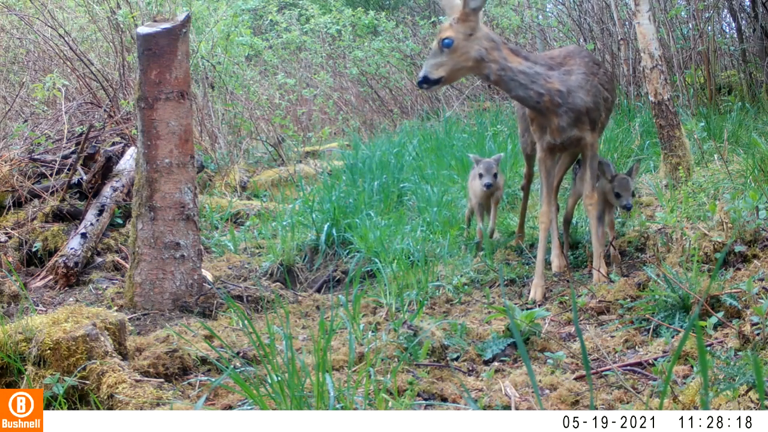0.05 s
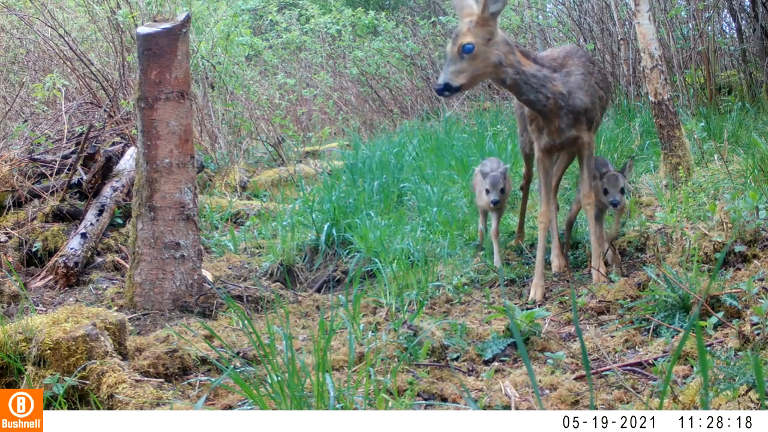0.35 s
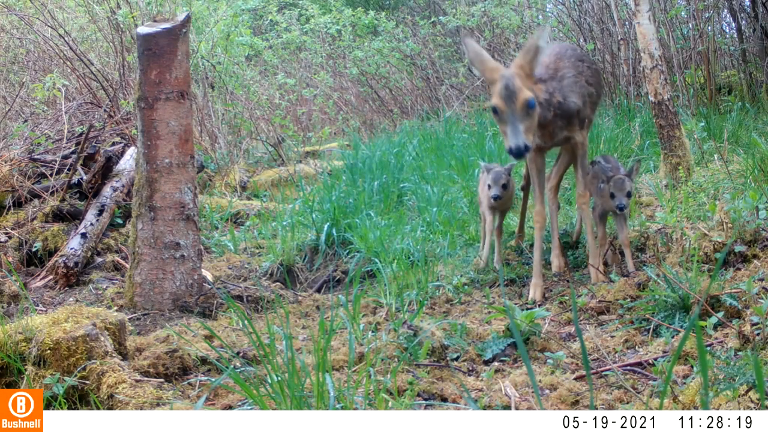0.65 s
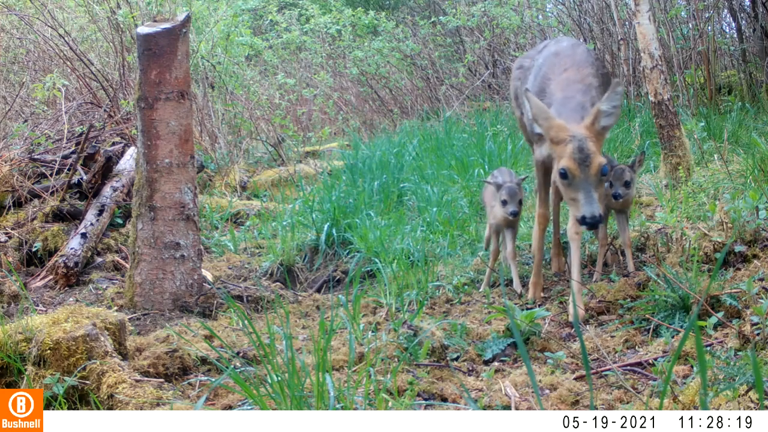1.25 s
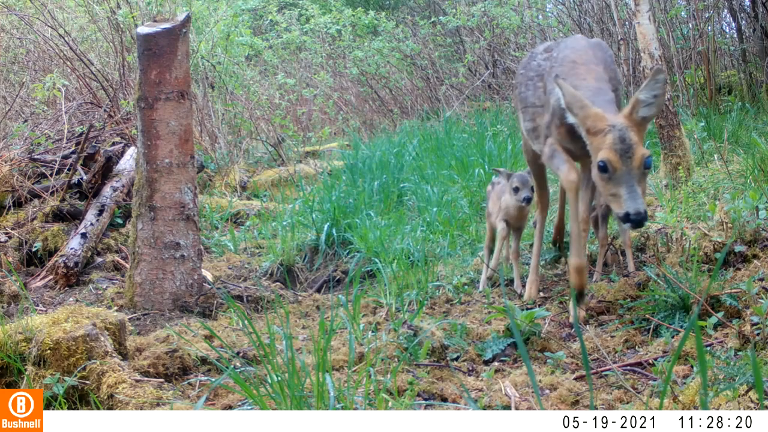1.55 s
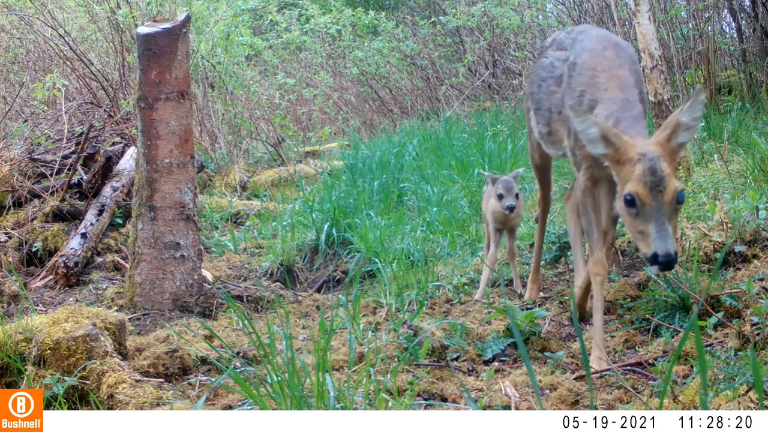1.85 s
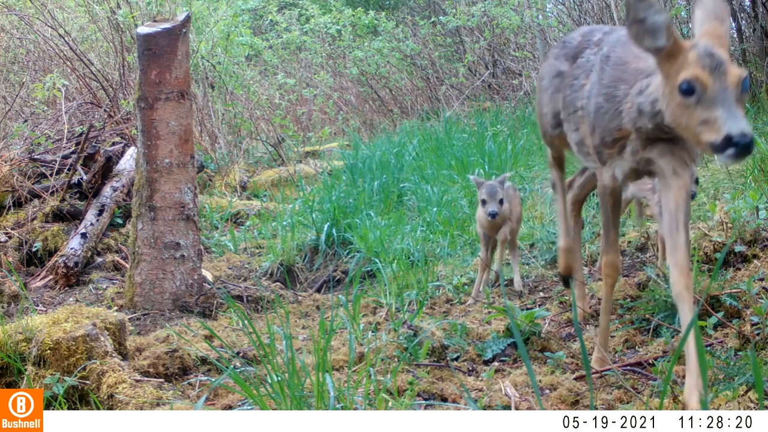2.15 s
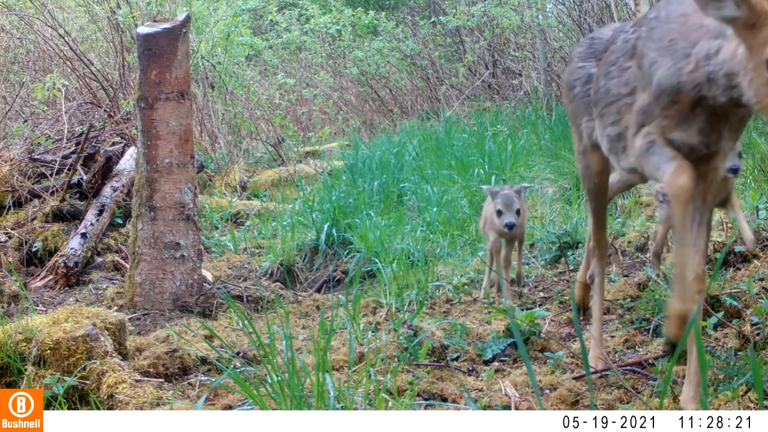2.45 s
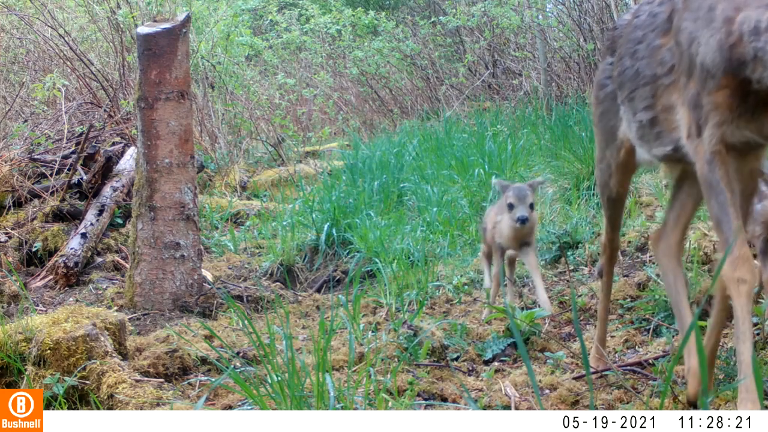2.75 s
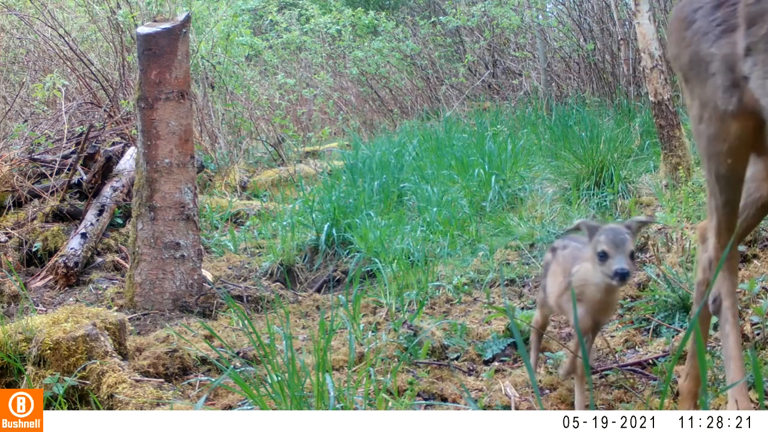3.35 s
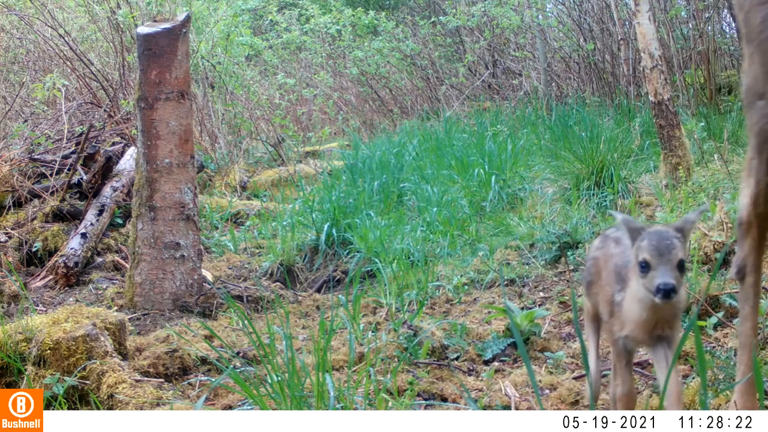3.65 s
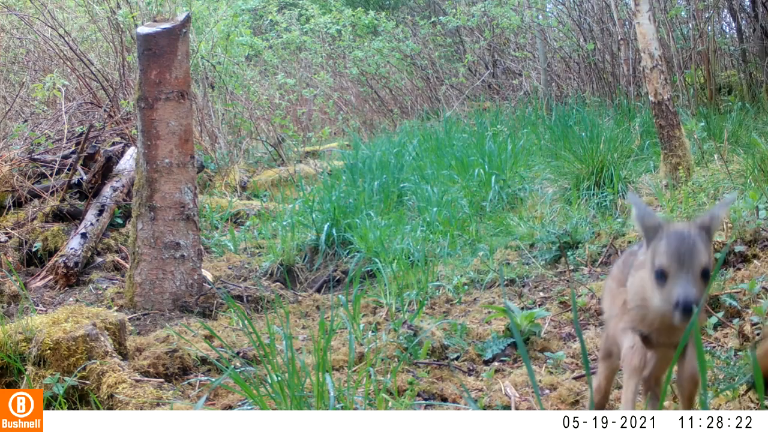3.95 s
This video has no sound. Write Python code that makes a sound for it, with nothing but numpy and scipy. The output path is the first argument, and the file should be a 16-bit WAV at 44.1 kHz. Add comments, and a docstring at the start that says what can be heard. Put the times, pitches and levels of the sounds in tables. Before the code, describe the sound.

Birds sing in a woodland clearing: echoing thrush whistles, a repeated high falling note and distant calls, then two quick trills and some chatter. Two tiny twig snaps and steady soft air come through a dull outdoor microphone.

```python
"""A woodland clearing, heard by a small outdoor camera with a dull microphone.
A steady wash of far air and leaves lies under it all, with the camera's faint hiss, hum and whine.
Thrushes start whistling, echoed by the trees; a chiffchaff joins with its repeated falling note,
and far birds call. Midway a twig snaps under a deer, then the thrushes add two trills.
At the end a small bird chatters and a second twig snaps."""
import sys
import numpy as np
from scipy import signal
from scipy.fft import rfft, irfft
from scipy.io import wavfile
from scipy.ndimage import uniform_filter1d, map_coordinates

SR = 44100
rng = np.random.default_rng(int(sys.argv[2]) if len(sys.argv) > 2 else 0)


def materialize(psi):
    """Save the field psi as 16-bit PCM at rate SR to the path in sys.argv[1].

    A 1-D psi becomes a single channel; in a 2-D psi each row is a channel.
    """
    bounded = np.clip(np.atleast_2d(psi).T, -1, 1)
    quanta = np.round(bounded * 32767).astype(np.int16)
    wavfile.write(sys.argv[1], SR, quanta)


N = 176400


def amp(db):
    """Decibels to gain."""
    return 10 ** (np.asarray(db) / 20)


def unit(x):
    """Scales to rms 1."""
    return x / np.sqrt(np.mean(x ** 2) + 1e-20)


def curve_at(points, hz):
    """Reads a curve along log frequency."""
    point_hz, value = np.transpose(points)
    return np.interp(np.log(hz + 1), np.log(point_hz + 1), value)


def waver(count, rate_hz):
    """A smooth random modulator, about 1 in size."""
    at = np.arange(count) * rate_hz / SR
    return map_coordinates(rng.standard_normal(1024), [at], order=3, mode="wrap")


def add(mix, start_s, sound, echo_db, direct=1):
    """Places a sound on the direct bus (row 0) and the echo send (row 1)."""
    part = mix[:, max(round(start_s * SR), 0):][:, :len(sound)]
    part += np.outer([direct, amp(echo_db)], sound[:part.shape[1]])


def dull_mic(hz, corner_hz=4590):
    """The microphone's gain at a pitch: the treble falls away steeply."""
    return 1 / np.sqrt(1 + (hz / corner_hz) ** 11)


# Tone colour of the far wash: frequency_hz, gain_db
WASH_EQ = [(20, -14), (42, -21), (90, -12), (300, -6.5), (500, -3), (850, -0.5), (2000, 1), (2700, -1),
           (3300, -7.5), (4100, -9), (5000, -22), (7500, -40), (10000, -56.5)]

def wash(level_db=-54, patch_db=0.6):
    """Far air and leaves: steady noise with faint drifting patches."""
    hz, _, spectrum = signal.stft(rng.standard_normal(N), SR, nperseg=2048)
    patches = uniform_filter1d(rng.standard_normal(spectrum.shape), size=14, axis=0)
    patches = unit(uniform_filter1d(patches, size=10, axis=1))
    spectrum *= amp(curve_at(WASH_EQ, hz)[:, None] + patch_db * patches)
    return amp(level_db) * unit(signal.istft(spectrum, nperseg=2048)[1][:N])


# Tone colour of the hiss: frequency_hz, gain_db
HISS_EQ = [(20, -17), (8000, -1), (11000, 1.5), (16000, 1)]
# Low hum and high whine: pitch_hz, level_db, width_hz
HUM_AND_WHINE = [(61.3, -82, 2.5), (121.7, -84.5, 3.6), (7800, -98, 7.2), (7826, -106, 3.3)]

def camera_noise(hiss_db=-82.5):
    """The camera's electronics add hiss and faint tones that wander in phase."""
    hz, t = np.fft.rfftfreq(N, 1 / SR), np.arange(N) / SR
    hiss = irfft(rfft(rng.standard_normal(N)) * amp(curve_at(HISS_EQ, hz)), N)
    out = amp(hiss_db) * unit(hiss)
    for pitch_hz, level_db, width_hz in HUM_AND_WHINE:
        phase = 2 * np.pi * pitch_hz * t + 0.49 * waver(N, 2 * width_hz)
        out += amp(level_db) * unit(np.sin(phase))
    return out


def syrinx(hz, gain, attack_s, release_s, jitter=0.0027, flutter_db=1.55):
    """A bird's voice: a soft-ended sine, unsteady in pitch and level."""
    t = np.arange(len(hz)) / SR
    ramps = np.clip(t / attack_s, 0, 1) * np.clip((t[-1] - t) / release_s, 0, 1)
    envelope = np.sin(np.pi / 2 * ramps) ** 2
    cycles = np.cumsum(hz * (1 + jitter * waver(len(t), 149))) / SR
    flutter = amp(flutter_db * waver(len(t), 63.2))
    return np.sqrt(2) * gain * envelope * flutter * np.sin(2 * np.pi * cycles)


# Whistles near and far: start_s, length_s, first_hz, held_hz, last_hz, onset_db, echo_send_db
THRUSH_WHISTLES = [ (0.118, 0.1, 1603, 1748, 1750, -54, -11), (0.266, .105, 2337, 2251, 2034, -55, -3.5),
                   (0.422, 0.068, 2085, 1957, 1790, -55.5, -1),
                   (0.576, 0.068, 2098, 1650, 1546, -50.5, -7.5),
                   (0.759, 0.068, 2710, 2574, 2710, -54, -2.5),
                   (0.865, 0.027, 2730, 2587, 2480, -55.5, -1.5), (1.008, .06, 3880, 3590, 3100, -60.5, -2),
                   (1.101, 0.077, 2624, 2583, 2560, -54.5, -3.5),
                   (1.176, 0.048, 2187, 2140, 2105, -53.5, -1), (1.19, 0.11, 1896, 1784, 1785, -60.5, -14),
                   (1.406, 0.054, 2435, 2313, 2100, -53.5, 2), (1.789, 0.18, 1731, 1892, 1800, -58.5, -6.5),
                   (2.074, 0.038, 2630, 2570, 1900, -53.5, -33), (2.144, .11, 1683, 1781, 1920, -62.5, 2.5),
                   (2.335, 0.097, 1850, 1800, 1500, -68, 8), (2.675, 0.064, 2140, 2040, 1750, -51.5, -3),
                   (2.872, .168, 1782, 1920, 1836, -46, -15), (2.919, 0.1, 2524, 2263, 2264, -52, -10.5),
                   (2.981, 0.1, 2320, 2204, 2200, -47.5, -3.5), (3.134, 0.16, 2890, 2732, 2716, -45, -8),
                   (3.467, 0.02, 3740, 3760, 3830, -52, 1.5), (3.619, 0.047, 2313, 3123, 2270, -52.5, -5),
                   (3.685, .06, 2215, 2786, 2153, -46, -7), (3.818, 0.028, 3090, 3113, 3200, -56.5, -1)]

def thrush_whistles(bend_s=0.036, swell_db=3):
    """Each whistle bends onto a held pitch and off it again, swelling as it goes."""
    out = np.zeros((2, N))
    for start_s, length_s, first_hz, held_hz, last_hz, onset_db, echo_db in THRUSH_WHISTLES:
        progress = np.linspace(0, 1, int(length_s * SR))
        bend = abs(2 * progress - 1) ** max(2, length_s / bend_s)
        hz = held_hz + bend * np.where(progress < 0.5, first_hz - held_hz, last_hz - held_hz)
        gain = amp(onset_db + swell_db * progress)
        add(out, start_s, syrinx(hz, gain, attack_s=0.0093, release_s=0.0051), echo_db)
    return out


# Reverb time of the wood: frequency_hz, t60_s
WOOD_DECAY = [(1500, 1.7), (2500, 1.79), (4000, 0.86), (6500, 0.48)]

def tree_echo(send, taps_per_s=2000, near_s=0.0084, edge_s=0.12, edge_db=-13.5):
    """Near twigs and far trunks scatter a thin tail; the clearing's edge returns one clear echo."""
    t = np.arange(SR) / SR
    taps = rng.standard_normal(SR) * (rng.random(SR) < taps_per_s / SR)
    taps *= 1 + 0.77 * np.exp(-t / near_s)
    hz, delay_s, spectrum = signal.stft(taps, SR, nperseg=256)
    decay = amp(-60 * delay_s / curve_at(WOOD_DECAY, hz)[:, None])
    tail = signal.istft(spectrum * decay, SR, nperseg=256)[1][:SR]
    tail /= np.linalg.norm(tail)
    tail[int(edge_s * SR)] += amp(edge_db)
    return signal.fftconvolve(send, tail)[:N]


# Falling notes, before treble loss: start_s, shelf_hz, shelf_s, level_db, hook_gain_db
CHIFFCHAFF_NOTES = [(0.28, 4680, 0.008, -70, 2), (0.609, 5070, 0.032, -69, 4),
                    (0.921, 4500, 0.0065, -65, 5), (1.263, 4690, 0.06, -65, 3), (1.59, 4980, 0.032, -65, 2),
                    (1.915, 4730, 0.0069, -65.5, 6.5), (2.254, 4760, 0.061, -69, -5),
                    (2.581, 5040, 0.03, -69, 1.5), (2.903, 4530, 0.005, -64.5, 2),
                    (3.895, 4860, 0.053, -71, -6)]

def chiffchaff(top_hz=6700, dip_hz=3610, hook_hz=4210, dive_s=0.0055, rise_s=0.04, hook_width_s=0.02):
    """Each note dives to a shelf, falls again to a dip, and ends in a small rising hook."""
    out, t = np.zeros((2, N)), np.arange(SR // 5) / SR
    for start_s, shelf_hz, shelf_s, level_db, hook_db in CHIFFCHAFF_NOTES:
        hook_at = min(0.048 + 2.5 * shelf_s, 0.127)
        dip_at = max(hook_at - rise_s, shelf_s + dive_s)
        fall = np.sin(np.pi / 2 * np.clip((t - shelf_s) / (dip_at - shelf_s), 0, 1))
        rise = np.sin(np.pi / 2 * np.clip((t - dip_at) / rise_s, 0, 1))
        hz = shelf_hz + (top_hz - shelf_hz) * np.exp(-t / dive_s)
        hz += (dip_hz - shelf_hz) * fall + (hook_hz - dip_hz) * rise
        body = amp(fall) * np.exp(-np.maximum(t - dip_at, 0) / dive_s)  # lifts 1 dB, then dies
        hook = amp(hook_db) * np.exp(-0.5 * ((t - hook_at) / hook_width_s) ** 2)
        gain = amp(level_db) * (body + hook) * dull_mic(hz) ** 0.5
        note = syrinx(hz, gain, attack_s=0.0068, release_s=0.011, jitter=0.0074, flutter_db=5)
        add(out, start_s, note, echo_db=-3)
    return out


# Distant slurs, before treble loss: start_s, length_s, first_hz, last_hz, level_db
FAR_SLURS = [(0.309, 0.045, 4820, 4190, -62), (0.324, 0.03, 2398, 1833, -49),
             (0.898, 0.13, 2685, 2622, -67.5), (1.07, .09, 3390, 4366, -61.5),
             (1.623, 0.044, 3417, 2654, -54), (2.023, 0.078, 3390, 2995, -58.5),
             (2.421, 0.046, 2994, 2890, -57.5), (3.191, 0.053, 4200, 5960, -58),
             (3.329, 0.068, 4280, 5630, -59.5), (3.489, 0.062, 2750, 2232, -50.5)]

def far_birds():
    """Rough gliding calls that arrive only as echo through the trees."""
    out = np.zeros((2, N))
    for start_s, length_s, first_hz, last_hz, level_db in FAR_SLURS:
        hz = np.linspace(first_hz, last_hz, int(length_s * SR))
        gain = amp(level_db) * dull_mic(hz)
        call = syrinx(hz, gain, attack_s=0.0053, release_s=0.0031, jitter=0.0797)
        add(out, start_s, call, echo_db=0, direct=0)
    return out


# Tiny dry cracks: start_s, level_db, centre_hz
TWIG_SNAPS = [(1.867, -57, 4160), (3.668, -63.5, 5560)]

def twig_snaps(decay_s=0.0022, half_width_octaves=0.23):
    """Twigs break under the deer, each a narrow band of noise that dies at once."""
    out, t, hz = np.zeros((2, N)), np.arange(1024) / SR, np.fft.rfftfreq(1024, 1 / SR)
    for start_s, level_db, centre_hz in TWIG_SNAPS:
        band = 1 / (1 + (np.log2((hz + 1) / centre_hz) / half_width_octaves) ** 2)
        crack = unit(irfft(rfft(rng.standard_normal(len(t))) * band))
        add(out, start_s, amp(level_db) * crack * np.exp(-t / decay_s), echo_db=-14)
    return out


# Fast trills: start_s, length_s, sweeps_per_s, centre_hz, arch_hz, sweep_hz, level_db
THRUSH_TRILLS = [(2.691, .135, 46, 2250, 249.5, 1052, -48.5), (3.127, 0.19, 53, 1866, 81, 328, -46)]

def thrush_trills(gap_gain=0.14):
    """Chains of quick upward sweeps whose pitch arches over the phrase."""
    out = np.zeros((2, N))
    for start_s, length_s, sweeps_per_s, centre_hz, arch_hz, sweep_hz, level_db in THRUSH_TRILLS:
        t = np.arange(0, length_s, 1 / SR)
        cycle = t * sweeps_per_s % 1
        hz = centre_hz + arch_hz * np.sin(np.pi * t / length_s) + sweep_hz * (cycle - 0.5)
        gain = amp(level_db) * (gap_gain + np.sin(np.pi * cycle) ** 2)
        add(out, start_s, syrinx(hz, gain, attack_s=0.01, release_s=0.014), echo_db=-10)
    return out


# Accents of the chatter, before treble loss: start_s, first_hz, level_db
CHATTER_CHIPS = [(3.462, 3377, -51), (3.56, 3210, -49), (3.578, 3280, -54), (3.641, 3330, -49.5),
                 (3.727, 3310, -53), (3.804, 3300, -53), (3.861, 3110, -53)]

def small_bird_chips(length_s=0.0128, rise_hz=1200):
    """A small bird's sharp chips, each a very quick upward slur."""
    out = np.zeros((2, N))
    for start_s, first_hz, level_db in CHATTER_CHIPS:
        hz = first_hz + np.linspace(0, rise_hz, int(length_s * SR))
        gain = amp(level_db) * dull_mic(hz)
        chip = syrinx(hz, gain, attack_s=0.0016, release_s=0.0034, jitter=0.022)
        add(out, start_s, chip, echo_db=-4)
    return out


def small_bird_twitter(from_s=3.46, slurs_per_s=190, length_s=0.0128, low_hz=3292, span_hz=1818):
    """Softer random slurs crowd between the chips and run on to the end."""
    out = np.zeros((2, N))
    for slot_s in np.arange(from_s, N / SR, 1 / slurs_per_s):
        late, first, last, strength = rng.random(4)
        hz = low_hz + span_hz * np.linspace(first, last, int(length_s * SR))
        gain = amp(-59) * 2 * strength ** 2 * dull_mic(hz)
        slur = syrinx(hz, gain, attack_s=0.0027, release_s=0.0034, jitter=0.029)
        add(out, slot_s + late / slurs_per_s, slur, echo_db=-4)
    return out


def scene():
    """Birds and twigs with their echoes over the wash, in mono."""
    buses = thrush_whistles() + chiffchaff() + far_birds() + twig_snaps() + thrush_trills()
    direct, echo_send = buses + small_bird_chips() + small_bird_twitter()
    return (direct + tree_echo(echo_send) + wash())[None]


def record(dry):
    """The camera adds its own noise and cuts the highest treble."""
    lowpass = signal.firwin(801, 15750, window=("kaiser", 9), fs=SR)
    return signal.oaconvolve(dry + camera_noise(), lowpass[None], "same")


dry = scene()
out = record(dry)
materialize(out)
```